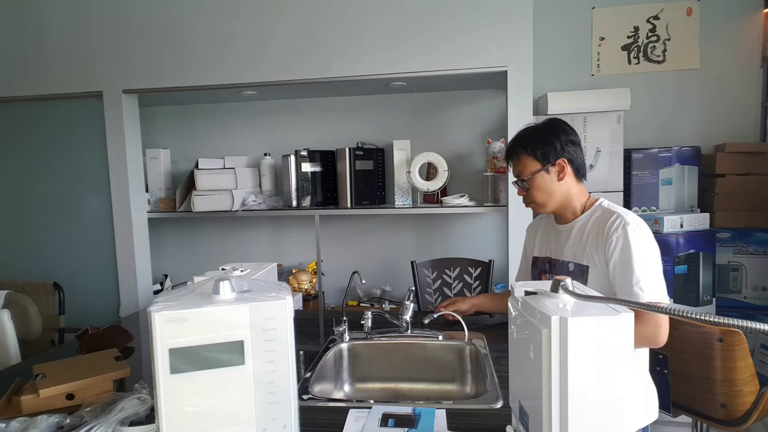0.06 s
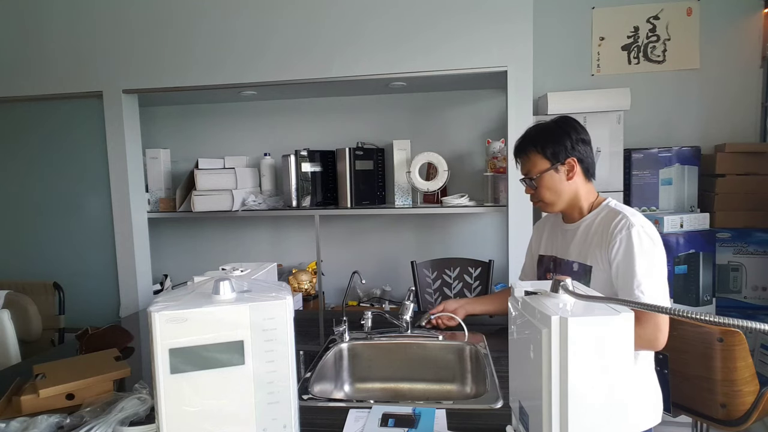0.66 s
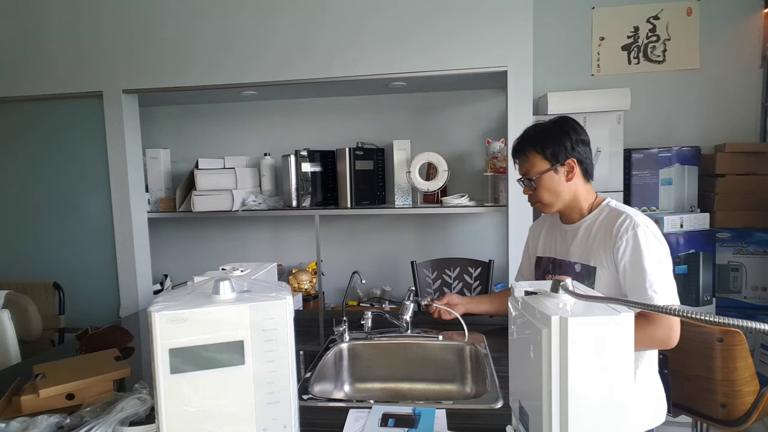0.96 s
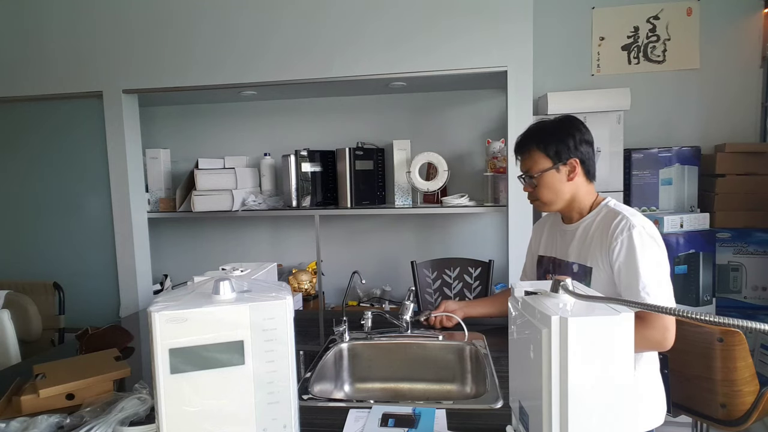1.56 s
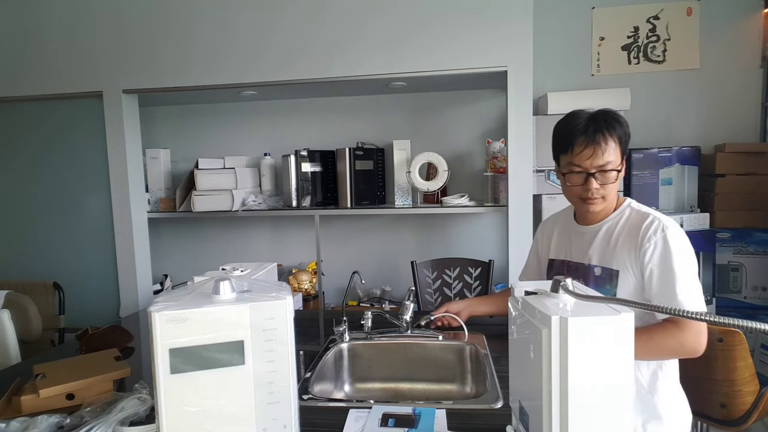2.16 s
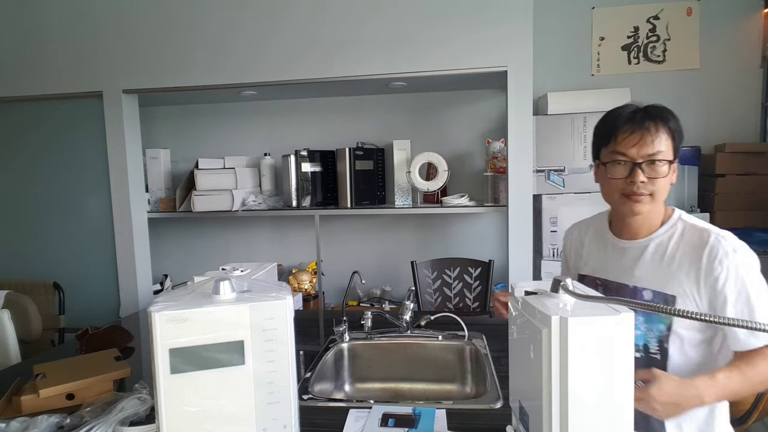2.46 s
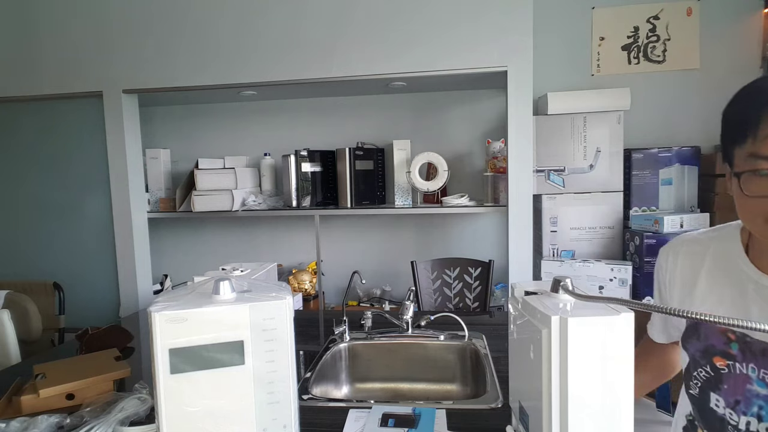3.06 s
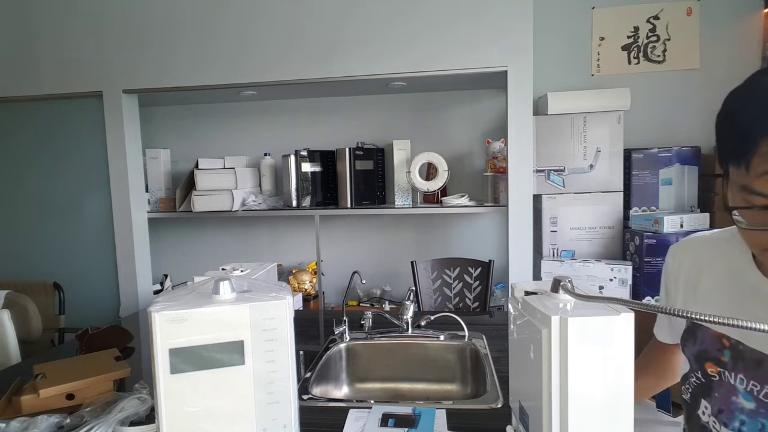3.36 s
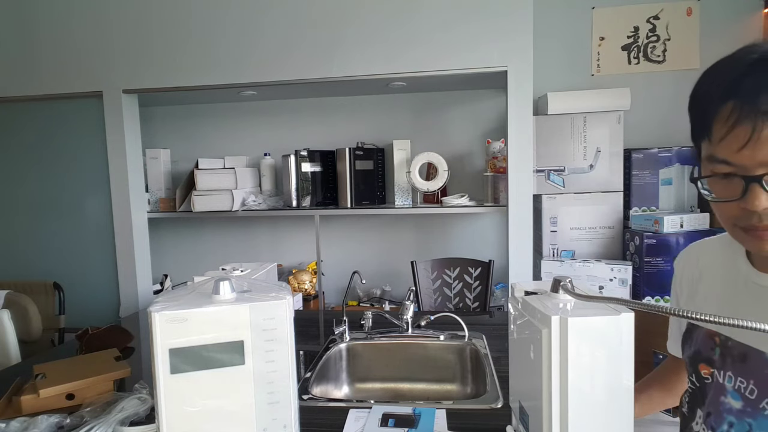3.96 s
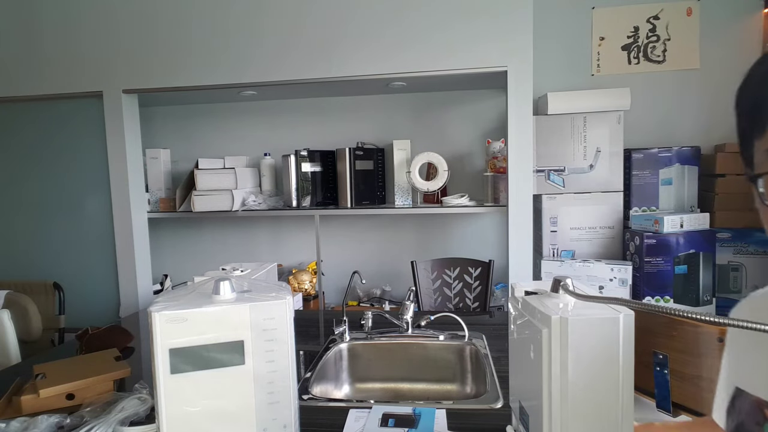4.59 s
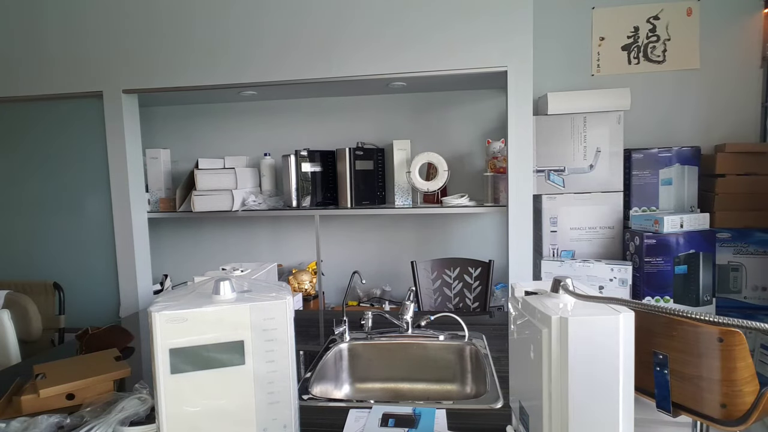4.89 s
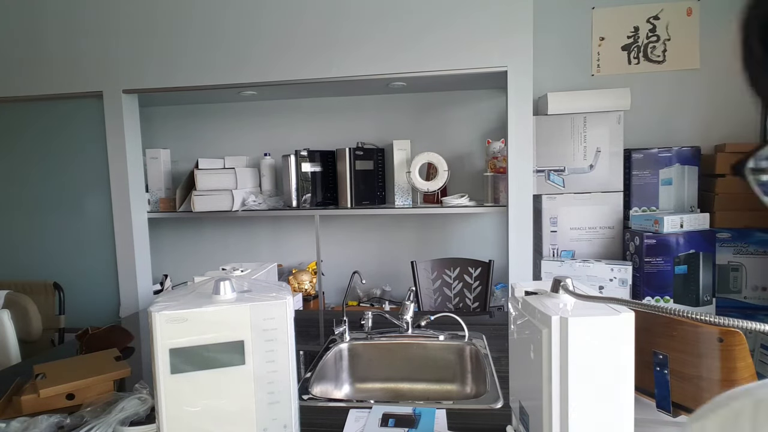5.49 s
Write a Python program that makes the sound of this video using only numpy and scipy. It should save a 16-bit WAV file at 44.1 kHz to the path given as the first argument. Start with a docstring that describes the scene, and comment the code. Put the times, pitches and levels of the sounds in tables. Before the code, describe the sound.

Quiet taps, footsteps and clothing rustle approach the microphone in a small workroom, over a soft rumble and faint pipe water. Then, close and much louder, an empty carton slides with a rough hiss, sticks briefly and tumbles with hollow thuds. One more thump comes with a crisp snap, followed by a couple of clicks, a barely audible high squeak and a final step.

```python
"""Dragging a carton in a workroom

A man steps up from a sink in a small, hard-walled room: light knocks, steps and brushing clothes over
a low rumble and faint water in a pipe. Close by he drags a hollow carton. Its fibres hiss, its edge
sticks and slips, and it tumbles with booming walls, then thumps once more with a snap.
A thin squeak and a last step follow. Two closely spaced microphone ports hear it all."""
import sys
import numpy as np
from scipy import signal
from scipy.fft import rfft, irfft, next_fast_len
from scipy.io import wavfile

SR = 44100
rng = np.random.default_rng(int(sys.argv[2]) if len(sys.argv) > 2 else 0)


def wav_record(signal):
    """Record a signal, one row per channel, as 16-bit PCM in the file named by sys.argv[1]."""
    frames = np.transpose(np.atleast_2d(signal))
    bounded = np.clip(frames, -1, 1)
    # unit amplitude maps onto the largest positive 16-bit level
    quanta = np.round(bounded * 32767).astype(np.int16)
    wavfile.write(sys.argv[1], SR, quanta)


N = 252913
TIME = np.arange(N) / SR
AGE = np.arange(24576) / SR  # seconds into one short sound


def amp(db):
    """Decibels to gain."""
    return 10 ** (np.asarray(db) / 20)


def unit(x):
    """Scale to rms 1."""
    return x / np.sqrt(np.mean(x ** 2))


def burst(x, db, span_s=.02):
    """Give a short sound the energy of span_s seconds at this level."""
    return x * amp(db) * np.sqrt(span_s * SR / np.sum(x ** 2))


def at(points, hz):
    """Read (Hz, value) points on a log-frequency axis."""
    f, value = np.transpose(points)
    return np.interp(np.log(hz + 1e-9), np.log(f), value)


def add(track, s, x):
    """Mix a sound into a track at a time."""
    i = int(s * SR)
    track[..., i:i + x.shape[-1]] += x[..., :N - i]


def lowpass(x, hz, order=2):
    """Smooth low-pass."""
    return signal.sosfilt(signal.butter(order, min(hz, .45 * SR), fs=SR, output="sos"), x + 1e-18)


def highpass(x, hz):
    """Smooth high-pass."""
    return signal.sosfilt(signal.butter(2, hz, "high", fs=SR, output="sos"), x)


def impulse(colour):
    """The shortest causal click that has this colour."""
    n = len(AGE)
    cepstrum = irfft(np.log(amp(at(colour, np.fft.rfftfreq(n, 1 / SR)))))
    cepstrum[1:n // 2] *= 2
    cepstrum[n // 2 + 1:] = 0
    return irfft(np.exp(rfft(cepstrum)))


def ring(hz, t60):
    """One struck mode."""
    return np.sin(2 * np.pi * hz * AGE) * np.exp(-np.log(1000) * AGE / t60)


def flutter(rate_hz):
    """A smooth random wobble with a spread near 1."""
    knots = np.arange(0, N / SR + 1, 1 / rate_hz)
    return np.interp(TIME, knots, rng.standard_normal(len(knots)))


def stroke(start_s, length_s, attack_s, release_s, fade_db_per_s=0):
    """An envelope: attack, sloping hold, release."""
    t = np.maximum(TIME - start_s, 0)
    hold = amp(-fade_db_per_s * np.minimum(t, length_s))
    return np.minimum(t / attack_s, 1) * hold * np.exp(-np.maximum(t - length_s, 0) / release_s)


def diffuse(colour, size, port_spacing_s=0.00052):
    """Coloured noise from all sides at the two ports: alike in the bass, unrelated in the treble."""
    n = next_fast_len(size, True)
    hz = np.fft.rfftfreq(n, 1 / SR)
    alike = .985 * np.sinc(2 * hz * port_spacing_s)
    noise = rfft(rng.standard_normal((2, n))) * amp(at(colour, hz))
    mid, side = noise * np.sqrt([1 + alike, 1 - alike])
    return unit(irfft([mid + side, mid - side], n)[:, :size])


def direct(x, shadow_hz, lead_s=.00022):
    """The straight path: dulled by furniture in the way, and reaching the left port first."""
    left = lowpass(x, shadow_hz, order=1)
    t = TIME[:len(x)]
    return np.array([left, np.interp(t - lead_s, t, left)])


# The room's reverb tail. Each row: band centre in Hz, seconds to fall 60 dB.
ROOM_DECAY = [(100, 0.36), (400, 0.31), (1500, 0.45), (5000, 0.59), (14000, 0.19)]

def room(x, build_s, bass_db=-6.0, lean_s=0.00012):
    """Reflections thicken, then die away, the top octave first; each spot has its own pattern."""
    hz = np.fft.rfftfreq(len(AGE), 1 / SR)
    noise = rfft(diffuse([(150, bass_db), (600, 0.0025)], len(AGE)))
    noise[1] *= np.exp(-2j * np.pi * hz * lean_s)  # most reflections reach the left port first
    tail = 0
    for centre, t60 in ROOM_DECAY:
        band = at([(f, float(f == centre)) for f, _ in ROOM_DECAY], hz)
        tail = tail + irfft(noise * band) * np.exp(-np.log(1000) * AGE / t60)
    tail *= 1 - np.exp(-(AGE / build_s) ** 2)
    tail /= np.sqrt(np.sum(tail ** 2) / 2)
    return signal.fftconvolve(x[None], tail, axes=1)[:, :len(x)]


# The colour of the quiet room. Each row: frequency in Hz, relative level in dB.
ROOM_TONE_COLOUR = [(11, -36.5), (18, 9.5), (26, -15), (66, -0.5), (90, -7), (123, -3.5), (199, -7.5),
                    (223, -10), (296, -13), (415, -15), (866, -14.5), (1360, -19.5), (2140, -23.5),
                    (8090, -40), (15500, -33)]

def room_tone(level_db=-58.5, start_dip_db=-2.5, settle_s=1):
    """Low building rumble and faint hiss, starting a little softer and settling."""
    return diffuse(ROOM_TONE_COLOUR, N) * amp(level_db + start_dip_db * np.exp(-TIME / settle_s))


# Bands that linger in a struck board. Each entry: centre in Hz.
BENDING_HZ = [260, 520, 900, 1500, 2600]

def disperse(x, q):
    """Bending waves travel at unequal speeds, which draws a click out into a few swings."""
    for hz in BENDING_HZ:
        _, poles = signal.iirpeak(hz, q, fs=SR)
        x = signal.lfilter(poles[::-1], poles, x)  # all-pass
    return x


# The dull body and the bright tip of a contact. Each row: frequency in Hz, relative level in dB.
THUD_COLOUR = [(50, 1.5), (100, -36), (150, 13), (230, 8.5), (400, 13), (750, 5), (1300, -2), (2000, -10.5),
               (4000, -59.5), (15000, -51)]
CLICK_COLOUR = [(100, -14.5), (700, 7), (1500, 2), (2700, -2), (4500, -12.5), (7000, -12.5), (9000, -25.5),
                (12000, -16), (16000, -18)]
# Close modes around a knocked object's main ring. Each row: multiple of its pitch, level in dB.
MODE_CLUSTER = [(.79, -6), (1, 0), (1.13, -4), (1.36, -7)]
# The man steps closer. Each row: time in seconds, gain of the straight path in dB.
APPROACH = [(2.2, -6), (2.6, 1)]
# Knocks and steps, with levels at the source. Each row: start in seconds, ring level in dB,
# ring pitch in Hz, seconds for the ring to fall 60 dB, thud level in dB, click level in dB.
KNOCKS = [ (0.57, -59.5, 516, 0.012, -57, -65.5), (0.67, -54.5, 560, 0.011, -77, -73),
          (.684, -49, 396, 0.029, -56, -74), (0.931, -54, 1255, 0.029, -66, -55.5),
          (2.022, -42.5, 536, 0.059, -40.5, -53), (2.033, -39, 365, 0.1, -36.5, -78),
          (2.199, -48.5, 504, 0.016, -54.5, -68), (2.523, -41, 483, 0.029, -51, -64),
          (2.626, -48.5, 515, 0.03, -54, -69), (3.099, -51, 620, 0.028, -52.5, -60),
          (3.149, -57, 563, 0.04, -59, -78), (3.167, -64, 456, .03, -54, -64),
          (3.505, -45.5, 295, 0.033, -65, -59), (3.783, -50.5, 286, 0.022, -58, -59),
          (4.845, -39, 1880, 0.074, -39, -35.5), (4.871, -38, 1758, 0.026, -54, -44.5),
          (5.5583, -33.5, 526, 0.014, -39, -51), ]

def knocks():
    """Each light knock or step is a dull thud, a contact click and the ring of whatever was touched."""
    out = np.zeros((2, N))
    thud = disperse(impulse(THUD_COLOUR), q=0.61)
    click = disperse(impulse(CLICK_COLOUR), q=4.2)
    for s, ring_db, hz, t60, thud_db, click_db in KNOCKS:
        modes = sum((-1) ** k * amp(db) * ring(hz * ratio, t60)
                    for k, (ratio, db) in enumerate(MODE_CLUSTER))
        tone = lowpass(highpass(modes, .5 * hz), 1.19 * hz)  # a small body radiates best near resonance
        knock = burst(tone, ring_db) + burst(thud, thud_db) + burst(click, click_db)
        nearness = amp(np.interp(s, *np.transpose(APPROACH)))
        straight = direct(knock, shadow_hz=3360, lead_s=0.000078) * nearness
        add(out, s, straight + room(knock, build_s=0.0024) * amp(2.0))
    return out


def pipe(start_s=1, pitch_hz=776, rise_hz_per_s=72, width_hz=70, level_db=-65):
    """Water runs faintly in a pipe: turbulence sounds one slowly rising resonance."""
    hz = pitch_hz + rise_hz_per_s * (TIME - start_s)
    flow = amp(level_db) * stroke(start_s, length_s=2, attack_s=0.36, release_s=.12)
    swirl = lowpass(rng.standard_normal((2, N)) + 1j * rng.standard_normal((2, N)), width_hz)
    resonance = np.real(swirl * np.exp(2j * np.pi * np.cumsum(hz) / SR))
    return unit(resonance) * flow


# Rubbing cloth, before each stroke's tilt. Each row: frequency in Hz, relative level in dB.
CLOTH_COLOUR = [(150, -5), (400, -5), (1200, -4), (2700, -5.5), (4500, -14), (7000, -17.5), (9000, -24),
                (12000, -20), (16000, -29)]
# Clothes and soles brushing. Each row: time of the peak in seconds, level in dB, rise in seconds.
BRUSHES = [(1.959, -62.5, 0.043), (2.595, -52, .012), (2.67, -46, 0.026), (2.759, -51, 0.023),
           (2.923, -64, 0.0037), (2.982, -60, 0.053), (3.161, -54, 0.03), (3.25, -51.5, .01),
           (3.336, -53.5, .03), (3.499, -49.5, .013), (4.755, -37.5, .007), (4.857, -35, .015),
           (4.988, -57.5, 0.0034)]

def brushes(fall_s=.062, bright_rise_s=0.031):
    """Short strokes of cloth and soles swell and fade; quick ones are brighter."""
    out = np.zeros((2, N))
    for s, db, rise_s in BRUSHES:
        tilt_db_per_octave = -2.28 + bright_rise_s / rise_s
        colour = [(hz, level + tilt_db_per_octave * np.log2(hz)) for hz, level in CLOTH_COLOUR]
        past_peak = AGE - 2 * rise_s
        swell = np.exp(-np.where(past_peak < 0, (past_peak / rise_s) ** 2, past_peak / fall_s))
        add(out, s - 2 * rise_s, amp(db) * swell * diffuse(colour, len(AGE)))
    return out


# The slap of cardboard. Each row: frequency in Hz, relative level in dB.
BOARD_COLOUR = [(30, -51.5), (50, -14.5), (85, -13), (160, 9), (300, -6), (400, 3), (500, 4.5), (750, 1),
                (1400, -1), (3000, -10), (15000, -14)]
# The carton's wall modes. Each row: pitch in Hz, relative level in dB, seconds to fall 60 dB.
PANEL_MODES = [(90.5, 8, 0.12), (124, -2, 0.54), (167.4, -3, 0.472), (220, -13, 0.19), (241.4, 6.5, 0.37),
               (299.3, 9.5, 0.28), (393, 10, 0.072), (473, -10, 0.14), (467, -5.5, 0.48), (698, 9.5, 0.31),
               (757, -6, .25), (918, -6, 0.33), (990, -0.5, 0.25), (1337, -5.5, 0.46)]
# The mix of an edge blow and of a face blow. Each lists slap, panel ring and boom in relative dB.
EDGE_MIX = (1, -8.5, -0.5)
FACE_MIX = (-0.58, -7.5, -2)
# The tumble, with levels at the source. Each row: start in seconds, blow gain in dB, crack level in dB,
# the edge's boom in Hz, the face's delay in seconds, the face's low-pass corner in Hz.
LANDINGS = [ (3.815, -22.5, -40.5, 271, .003, 294), (3.904, -28.5, -32.5, 215, .026, 250),
            (4.070, -41, -41.5, 211, .008, 790), (4.234, -32, -38.5, 195, 0.029, 408),
            (4.4048, -12.5, -21, 313, 0.0028, 960), (4.435, -21, -26.5, 246, .003, 900),
            (4.471, -14, -21.5, 235.6, .015, 1640), (4.515, -12, -29.5, 473.6, 0.038, 900),
            (4.7511, -18, -31, 326, .0145, 1620), ]

def carton_landings(boom_t60=0.073, face_boom_ratio=0.496):
    """The carton cracks down on an edge, then its broad face slaps down and booms lower."""
    out = np.zeros((2, N))
    click = impulse(CLICK_COLOUR)
    panels = sum((-1) ** k * amp(db) * ring(hz, t60) for k, (hz, db, t60) in enumerate(PANEL_MODES))
    board = disperse(impulse(BOARD_COLOUR), q=2.82)

    def strike(mix, corner_hz, boom_hz):
        """One blow slaps the board, rings the panels and makes the struck side boom."""
        slap_db, panel_db, boom_db = mix
        slap = burst(lowpass(board, corner_hz), slap_db)
        ringing = burst(lowpass(panels, corner_hz), panel_db)
        boom = ring(boom_hz, boom_t60) * (1 - np.exp(-AGE / 0.0011))
        return slap + ringing + burst(boom, boom_db)

    for s, db, crack_db, boom_hz, late_s, face_hz in LANDINGS:
        grit = rng.standard_normal(len(AGE)) ** 3 * np.exp(-AGE / 0.0036)
        crack = signal.fftconvolve(grit, click)[:len(AGE)]
        edge_hz = 1450 * 2 ** (db / 11)  # an octave duller for every 11 dB softer
        edge = amp(db) * strike(EDGE_MIX, edge_hz, boom_hz) + burst(crack, crack_db)
        face = amp(db) * strike(FACE_MIX, face_hz, face_boom_ratio * boom_hz)
        for when, blow in (s, edge), (s + late_s, face):
            straight = direct(blow, shadow_hz=900) * amp(-1.5)
            add(out, when, straight + room(blow, build_s=0.0024, bass_db=-5) * amp(1.0))
    return highpass(highpass(out, 48), 52)  # too small to radiate deep bass


# Pushes that drag the carton. Each row: start in seconds, length in seconds, hiss level in dB,
# fade in dB per second (negative swells).
PUSHES = [(3.82, 0.29, -42, -15.5), (4.08, 0.096, -34.5, -7), (4.206, 0.16, -34.5, 2),
          (4.40, 0.043, -38.5, 19), (4.444, 0.14, -34.5, 54.5)]

def dragging(attack_s=0.024, release_s=0.077):
    """How hard the carton slides: the pushes add up in power."""
    power = sum((amp(db) * stroke(s, length, attack_s, release_s, fade)) ** 2
                for s, length, db, fade in PUSHES)
    return np.sqrt(power)


# The hiss of sliding cardboard. Each row: frequency in Hz, relative level in dB.
SLIDE_COLOUR = [(150, -26.5), (250, -19.5), (308, -4.5), (372, -19.5), (466, -4), (593, -9), (929, -7),
                (1220, -10.5), (2850, -11), (3890, -12.5), (6880, -13), (15500, -18.5)]
# Where that hiss sits in stereo. Each row: frequency in Hz, left minus right in dB.
SLIDE_PAN = [(1000, 0.5), (4000, 0), (8000, 1.5), (13000, 5)]

def slide(grain_db=1.0):
    """Fibres scrape past each other in a dense, slightly grainy hiss whose treble leans left."""
    n = next_fast_len(N, True)
    lean_db = at(SLIDE_PAN, np.fft.rfftfreq(n, 1 / SR))
    pan = amp(np.array([lean_db, -lean_db]) / 2)
    hiss = irfft(rfft(diffuse(SLIDE_COLOUR, n)) * pan, n)[:, :N]
    return hiss * dragging() * amp(grain_db * flutter(600))


# The dragged edge catches. Each row: start in seconds, length in seconds, added force in dB,
# slowing of the slips in octaves.
CATCHES = [(3.914, 0.087, -33.5, .85), (4.232, .05, -38, .15)]

def judder(slip_hz=205, sliding_db=-14, patchy_db=6.5, release_s=0.026):
    """The edge sticks and slips in an uneven sawtooth, which the hollow body rounds to a groan."""
    force = amp(sliding_db) * dragging()
    octaves_down = 0
    for s, length, db, slowing in CATCHES:
        force += amp(db) * stroke(s, length, attack_s=0.0057, release_s=release_s, fade_db_per_s=53)
        octaves_down += slowing * stroke(s, length, attack_s=length, release_s=release_s)
    hz = slip_hz * 2 ** -octaves_down * (1 + .09 * flutter(200))
    sawtooth = (np.cumsum(hz) / SR) % 1 - .5
    groan = unit(lowpass(sawtooth, 200)) * force * amp(patchy_db * flutter(90))
    groan = highpass(highpass(groan, 75), 60)
    return direct(groan, shadow_hz=2000, lead_s=0.00039) + room(groan, build_s=0.013) * amp(-15.0)


# The bright snap of the last landing. Each row: frequency in Hz, relative level in dB.
SNAP_COLOUR = [(500, -12), (2500, -8), (6000, -3), (9500, -15), (12500, 1), (15500, 3)]

def snap(start_s=4.7512, level_db=-38, decay_s=0.0024):
    """The last landing snaps like a stiff flap: a sharp crackle close to the ports."""
    out = np.zeros((2, N))
    grit = rng.standard_normal(len(AGE)) * np.exp(-AGE / decay_s)
    crackle = burst(signal.fftconvolve(grit, impulse(SNAP_COLOUR))[:len(AGE)], level_db)
    add(out, start_s, direct(crackle, shadow_hz=15000) + room(crackle, build_s=.004) * amp(-18))
    return out


# The squeak's contour. Each row: time in seconds, pitch in Hz, level in dB.
SQUEAK = [(5.21, 10800, -80), (5.27, 12000, -72), (5.33, 12300, -68), (5.38, 11950, -70),
          (5.44, 12550, -68), (5.47, 11800, -72), (5.5, 10800, -81)]

def squeak(rasp_db=-13, waver_db=5.0):
    """A barely audible, unsteady high squeak with fainter tones wavering below it."""
    times, pitches, levels = np.transpose(SQUEAK)
    hz = np.interp(TIME, times, pitches) * (1 + .008 * flutter(1500))
    phase = 2 * np.pi * np.cumsum(hz) / SR
    undertones = sum(flutter(120) * np.sin(ratio * phase) for ratio in (.66, .74))
    tone = np.sin(phase) + amp(rasp_db) * undertones
    db = np.interp(TIME, times, levels) + waver_db * flutter(60)
    gate = (TIME >= times[0]) & (TIME <= times[-1])
    return direct(tone * amp(db) * gate, shadow_hz=15000, lead_s=0)


def scene():
    """The stereo mix: the man and his carton in front, pipe and room tone behind."""
    action = knocks() + carton_landings() + snap() + judder() + slide() + brushes() + squeak()
    return action + pipe() + room_tone()


def record(dry, bass_hz=25, top_hz=15850):
    """Thin the deepest bass, round the highest peaks and cut the top."""
    rounded = np.tanh(0.79 * highpass(dry, bass_hz)) / 1.053
    return signal.sosfilt(signal.ellip(10, .1, 80, top_hz, fs=SR, output="sos"), rounded)


dry = scene()
out = record(dry)
wav_record(out)
```